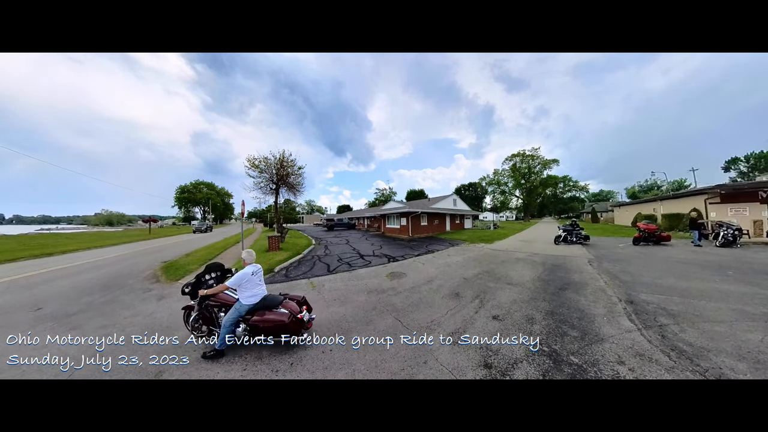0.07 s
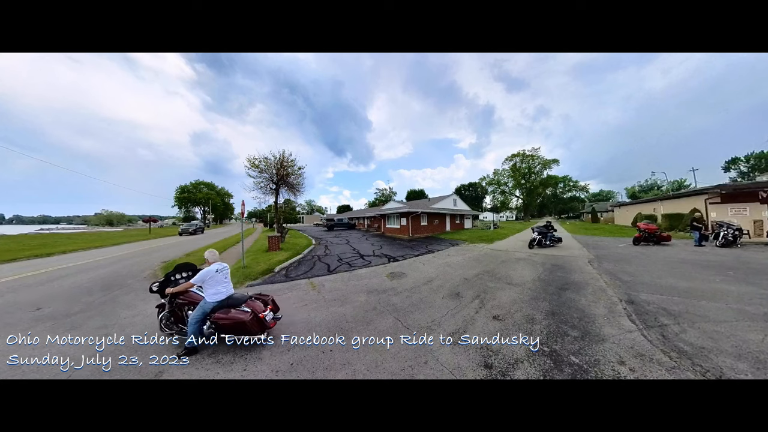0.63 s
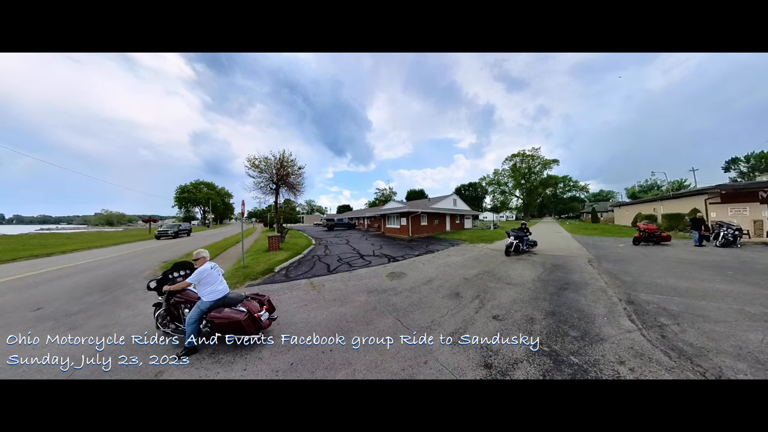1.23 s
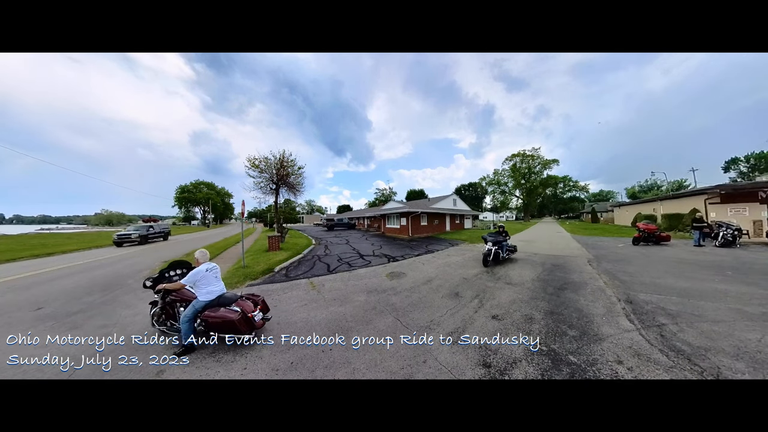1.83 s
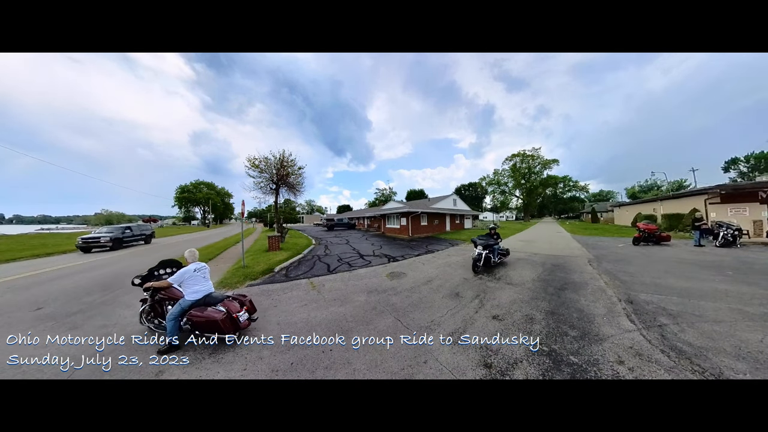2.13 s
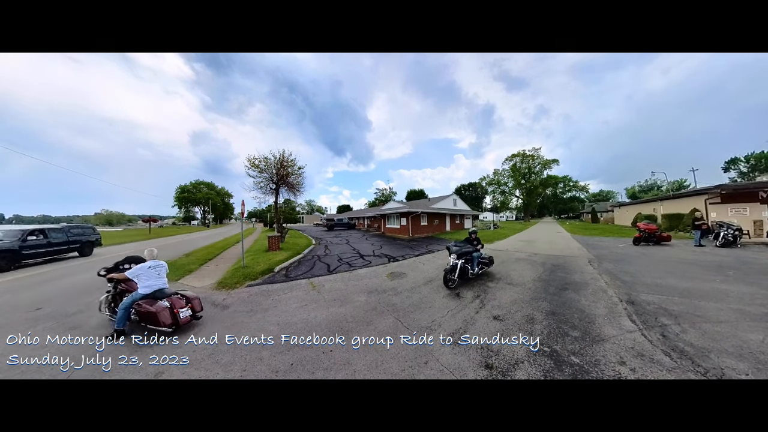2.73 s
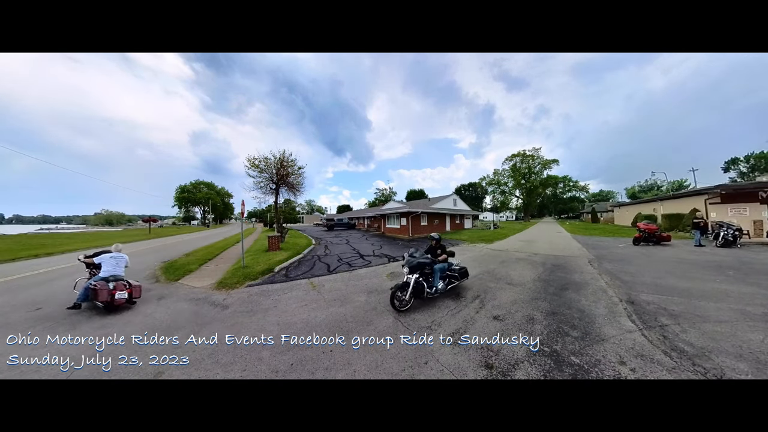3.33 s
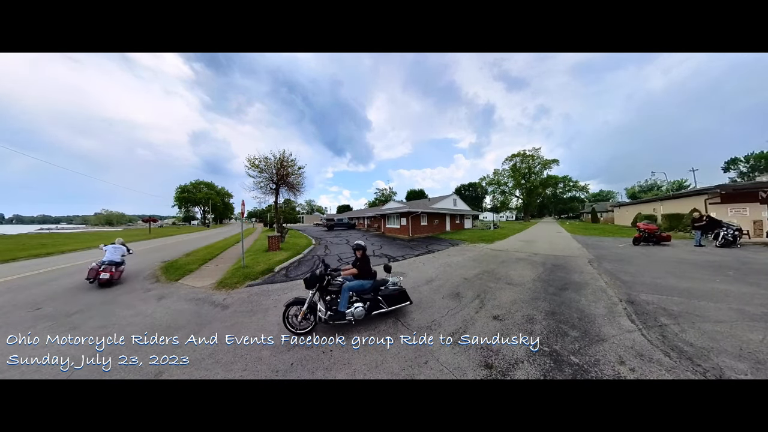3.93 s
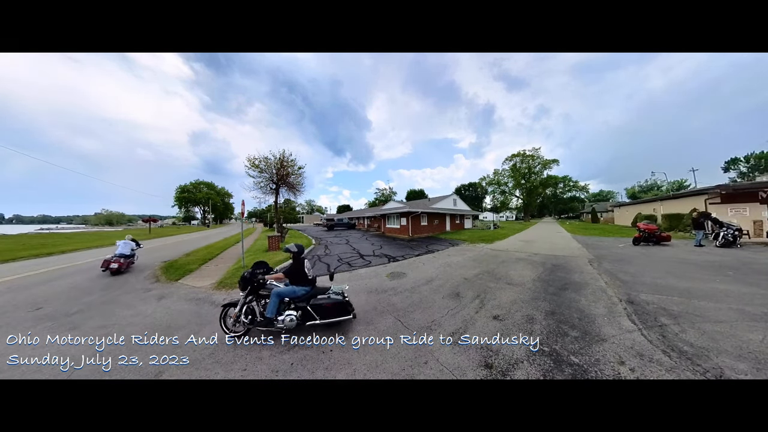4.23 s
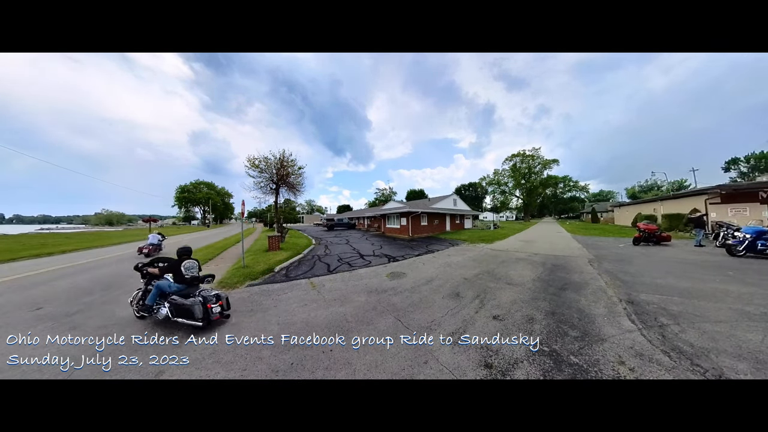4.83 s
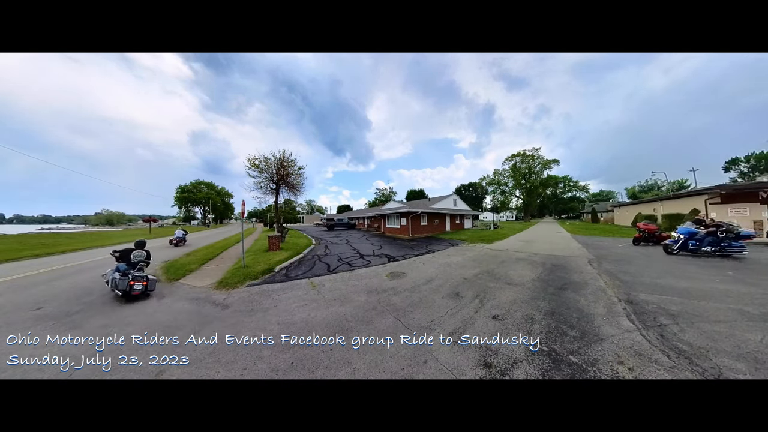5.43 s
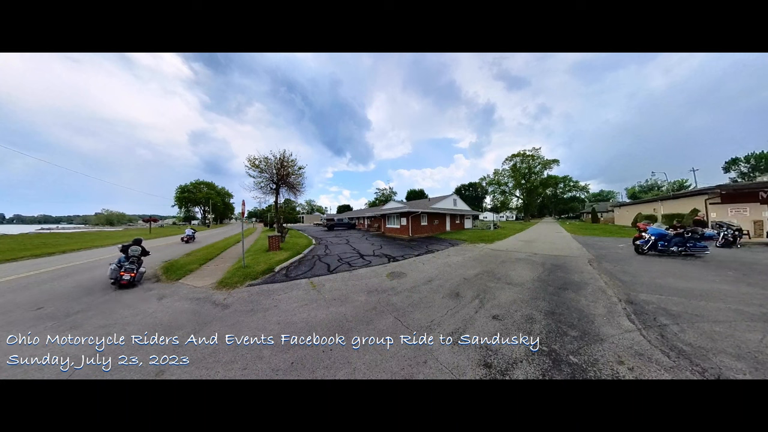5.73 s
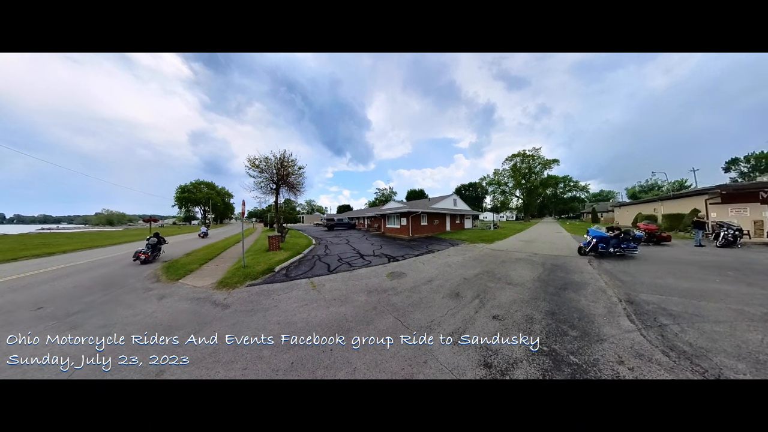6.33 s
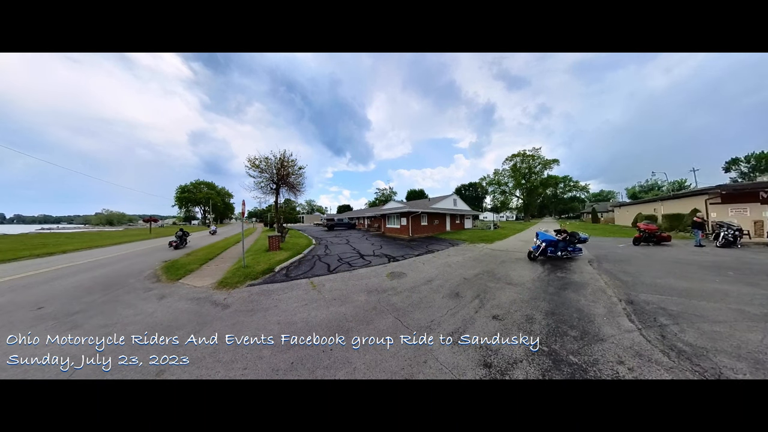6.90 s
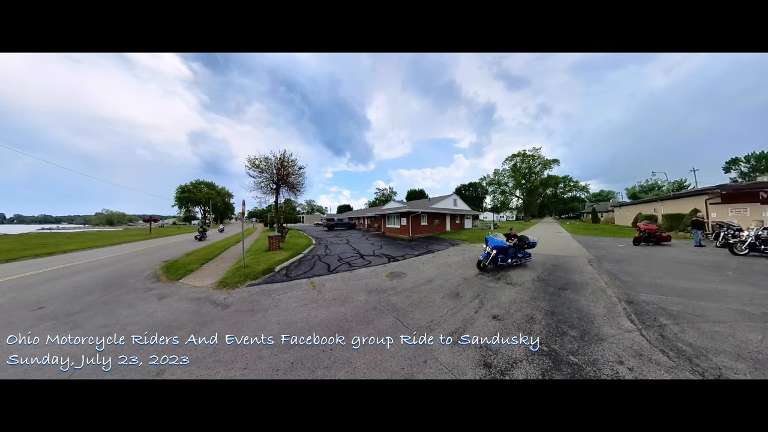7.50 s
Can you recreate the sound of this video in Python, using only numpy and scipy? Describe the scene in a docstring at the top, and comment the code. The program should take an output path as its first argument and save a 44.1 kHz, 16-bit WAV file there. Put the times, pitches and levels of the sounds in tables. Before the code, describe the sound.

Cruiser motorcycles chug at low revs, then pull away one after another with deep, booming, barking exhausts while others idle behind.

```python
"""Three V-twin motorbikes leave a parking lot one after another and pass a two-port microphone.
Every firing booms in the pipe, barks and spits a short ping, as loud as throttle, revs and distance
make it. Hard firings thump, loose metal chinks, intakes rasp, and gears and brakes whine.
More bikes idle and blip their throttles behind, amid rattling and a low breeze.
The buildings throw the sound back, and gain control holds the level."""
import sys
import numpy as np
from scipy import signal
from scipy.fft import rfft, irfft
from scipy.io import wavfile
from scipy.ndimage import uniform_filter1d, minimum_filter1d

SR = 44100
rng = np.random.default_rng(int(sys.argv[2]) if len(sys.argv) > 2 else 0)


def materialize(psi):
    """Save the field psi as 16-bit PCM at rate SR to the path in sys.argv[1].

    A 1-D psi becomes a single channel; in a 2-D psi each row is a channel.
    """
    bounded = np.clip(np.atleast_2d(psi).T, -1, 1)
    quanta = np.round(bounded * 32767).astype(np.int16)
    wavfile.write(sys.argv[1], SR, quanta)


N = 337806
TIME = np.arange(N) / SR


def amp(db):
    return 10 ** (np.asarray(db) / 20)


def evened(x):
    """Scale a sound to an average (rms) level of 1."""
    return x / np.sqrt(np.mean(x ** 2) + 1e-20)


def loudness(x, span_s):
    """Running average (rms) level of all channels."""
    return np.sqrt(abs(uniform_filter1d((x ** 2).mean(0), max(round(span_s * SR), 1))) + 1e-12)


def curves(rows):
    """Turn rows that start with a time into one curve for each other column."""
    s, *columns = np.transpose(rows)
    return [np.interp(TIME, s, c) for c in columns]


def db_at(points, hz):
    """Read a tone shape between its points, on a log frequency scale."""
    f, db = np.transpose(points)
    return np.interp(np.log(hz + 1), np.log(f + 1), db)


def colour(x, points, size=8192):
    """Filter a sound to a tone shape that falls away above its last point."""
    hz = abs(np.fft.fftfreq(size, 1 / SR))
    gain = amp(db_at(points, hz)) / np.maximum(hz / points[-1][0], 1) ** 2
    response = np.exp(np.conj(signal.hilbert(np.log(gain))))  # rings after a push, never before
    taps = np.fft.ifft(response).real[:size // 2]
    return irfft(rfft(x) * rfft(taps, N), N)


def resonate(x, hz, width_hz):
    """Let a sound ring at a pitch, which may move."""
    turn = np.exp(2j * np.pi * np.cumsum(hz * np.ones(N)) / SR)
    keep = np.exp(-np.pi * width_hz / SR)
    return 2 * (turn * signal.lfilter([1 - keep], [1, -keep], x / turn + 1e-18)).real


def wander(per_s):
    """A random drift, about 1 in size."""
    knots = rng.standard_normal(4000)
    return np.interp(TIME * per_s, np.arange(len(knots)), knots)


def place(x, side, lag_samples=7.3):
    """The nearer port hears all but the top treble first. Side -0.5 is fully left, 0.5 fully right."""
    turn = np.minimum(np.fft.rfftfreq(N) * lag_samples, 1)
    late = irfft(rfft(x) * np.exp(-2j * np.pi * turn), N)
    right = np.clip(.5 + side, 0, 1)
    return np.array([x + right * (late - x), late + right * (x - late)])


def firings(rpm, start, rear_lag):
    """The samples at which the front and rear cylinders fire; one cycle takes two turns."""
    cycles = start + np.cumsum(rpm) / (120 * SR)
    return [np.flatnonzero(np.diff(np.floor(cycles - lag)) > 0) for lag in (0, rear_lag)]


def pulses(fired, rear_db, scatter_db, delay_s=0):
    """One push for each firing, never quite equally strong."""
    train = np.zeros(N)
    for at, db in zip(fired, (0, rear_db)):
        strength = amp(db + scatter_db * rng.standard_normal(400)[:len(at)])
        train[np.clip(at + round(delay_s * SR), 0, N - 1)] = strength
    return train


def swell(train, rise_s, order):
    """Pressure swells and dies after each push."""
    u = np.arange(3000) / SR / rise_s
    return signal.oaconvolve(train, u ** order * np.exp(-order * u))[:N]


def boom(fired, rpm, pipe, rear_db, drone_db, delay_s):
    """Firings boom in the pipe; both cylinders add up to a drone at five times the cycle rate."""
    beats = evened(colour(pulses(fired, rear_db, .31, delay_s), pipe))
    push, drone_hz = pulses(fired, 0, 1, delay_s), 5 * rpm / 120
    drone = evened(resonate(resonate(push, drone_hz, 12), drone_hz, 12) / rpm)
    return evened(beats + amp(drone_db) * drone)


def bark(fired, tone, rough, muffler=None):
    """Each firing is part clean push, part rough puff of gas; an open muffler adds two notes."""
    push = pulses(fired, rear_db=-3, scatter_db=1.2, delay_s=-.001)
    puffs = swell(push, .0034, order=1) * rng.standard_normal(N)
    out = evened(colour((1 - rough) * evened(push) + rough * evened(puffs), tone))
    if muffler:
        hollow_hz, hollow_db, note_hz, note_db = curves(muffler)
        out += amp(-12.5) * np.interp(TIME - .00805, TIME, out)  # one bounce off the pipe's far end
        hollow = resonate(out, hollow_hz * (1 + .06 * wander(25)), width_hz=80)
        note = resonate(resonate(push, note_hz, 100), note_hz, 50)
        out = evened(out + amp(hollow_db) * hollow) + amp(note_db) * evened(note)
    return out


# The whistle in each spit. Each row: time in seconds, middle pitch in Hz.
WHISTLE_PITCH = [(1.3, 7830), (2.3, 6724), (3.4, 6100), (4.1, 6437), (7.66, 6040)]
# The tone of its hiss. Each row: frequency in Hz, level in dB.
HISS_TONE = [(2000, -9), (3700, 6.5), (4700, 6.5), (6300, 5.5), (8000, 1), (9500, -4), (12000, -11),
             (14000, -35)]
# Extra top treble in the hiss. Each row: time in seconds, share added.
HISS_TOP = [(1.8, 0), (2.4, 2.2), (3.7, 0)]


def spit(fired, side, spread=.1, fall_per_s=20, rough=.08):
    """Gas squeezes through a narrow gap: two falling whistles, pitched anew each firing, in a hiss."""
    train = pulses(fired, rear_db=-1.5, scatter_db=2.8, delay_s=-.005)
    count = np.cumsum(train > 0)
    age = TIME - np.maximum.accumulate(TIME * (train > 0))
    middle_hz, = curves(WHISTLE_PITCH)
    whistle = np.zeros(N)
    for ratio, db, peak_s in (1, 0, .005), (1.24, -3.5, .0042):
        pitch, fall, strength = rng.standard_normal((800, 3))[count].T
        glide = -fall_per_s * (1 + .5 * fall) * (np.minimum(age, 2 * peak_s) - peak_s)
        hz = ratio * middle_hz * np.exp(spread * pitch + glide + rough * wander(3000))
        envelope = amp(db + 2 * strength) * evened(swell(train, peak_s, order=10))
        whistle += envelope * np.sin(2 * np.pi * np.cumsum(hz) / SR)
    # the hiss scatters off the frame and the road, differently to each port
    bursts = evened(swell(train, .005, order=8)) + .25 * evened(swell(train, .007, order=2))
    hiss = np.array([evened(colour(bursts * rng.standard_normal(N), HISS_TONE)) for _ in range(2)])
    hiss -= np.array([resonate(h, .61 * middle_hz, 1600) for h in hiss])  # weak below the whistle
    hiss += curves(HISS_TOP)[0] * np.array([resonate(h, 10800, 1560) for h in hiss])
    return amp(-3.5) * place(evened(whistle), side) + hiss


def throttle(twists, lag_s=.017):
    """The throttle follows the rider's hand a moment late."""
    hand = sum(opening * ((TIME >= start) & (TIME < end)) for start, end, opening in twists)
    keep = np.exp(-1 / (lag_s * SR))
    return signal.lfilter([1 - keep], [1, -keep], np.minimum(hand, 1))


def path(nearest_s, nearest_m, m_per_s, acceleration, side):
    """A bike rolls by, then speeds up: how close it is, how far its tail faces us, and its side."""
    since = TIME - nearest_s
    along = m_per_s * since + .5 * acceleration * np.maximum(since, 0) ** 2
    distance = np.hypot(nearest_m, along)
    tail = along / distance
    return nearest_m / distance, tail, side - .67 * tail


# How boom, bark and spit change, one row for each.
# Each row: dB with the throttle shut, dB per octave of revs, dB with the tail facing us.
EXHAUST_CHANGES = [(-6.5, 2.5, 3.5), (-11, -1.5, 4.5), (-28, -4.5, -6.5)]


def ride(fired, rpm, twists, route, booms, barks, boom_db, bark_db, spit_db):
    """Mix a moving bike's boom, bark and spit by throttle, revs, distance and heading."""
    closeness, tail, side = route
    shut, octaves = 1 - throttle(twists), np.log2(rpm / rpm.mean())
    boom_gain, bark_gain, spit_gain = [
        closeness * amp(db + shut_db * shut + revs_db * octaves + tail_db * tail)
        for db, (shut_db, revs_db, tail_db) in zip((boom_db, bark_db, spit_db), EXHAUST_CHANGES)]
    return place(boom_gain * booms + bark_gain * barks, side) + spit_gain * spit(fired, side)


# Engine speed. Each row: time in seconds, turns per minute.
FIRST_REVS = [(0, 1090), (1.4, 1109), (1.7, 841), (1.9, 960), (2.15, 1352), (2.42, 1684), (2.7, 1304),
              (3, 1288), (3.27, 1137), (3.55, 1377), (4, 1570), (5.2, 2106), (7.66, 2800)]
# Twists of the throttle. Each row: start and end in seconds, opening from 0 to 1.
FIRST_TWISTS = [(1.707, 1.98, 0.77), (1.982, 2.47, 0.87), (2.5, 3.111, 0.72), (3.12, 4.767, 0.84),
                (4.738, 5.095, 0.68), (5.093, 8, 0.37)]
# The tones of the boom and of a soft bark. Each row: frequency in Hz, level in dB.
FIRST_BOOM_TONE = [(30, -16.5), (50, -5.5), (65, 2.5), (108, 1.5), (150, -4.5), (200, -16.5), (300, -27),
                   (500, -56.5), (1200, -88)]
SOFT_BARK_TONE = [(100, -11), (300, 14), (450, -1), (700, 1), (1100, -4.5), (1600, -6.5), (4000, -13),
                  (9000, -23)]
FIRST_START, FIRST_LAG = .3, .44  # in engine cycles


def first_bike():
    """The first bike's exhaust has a soft, breathy bark and the strongest spit."""
    rpm, = curves(FIRST_REVS)
    fired = firings(rpm, FIRST_START, FIRST_LAG)
    booms = boom(fired, rpm, FIRST_BOOM_TONE, rear_db=1, drone_db=-10.5, delay_s=.0004)
    barks = bark(fired, SOFT_BARK_TONE, rough=.87)
    route = path(nearest_s=5.5, nearest_m=3, m_per_s=-.5, acceleration=16, side=0)
    return ride(fired, rpm, FIRST_TWISTS, route, booms, barks, boom_db=-13, bark_db=-33.5, spit_db=-31.5)


# The first bike's low note. Each row: time in seconds, pitch in Hz, level in dB.
THROB_NOTE = [(0, 108, -18.5), (.85, 111, -18), (1.3, 93, -20), (1.7, 124, -21), (2.9, 118, -20),
              (4.2, 125, -40)]


def throb(width_hz=65):
    """Firings ring the low note of the first bike's pipe until it is away."""
    hz, db = curves(THROB_NOTE)
    fired = firings(curves(FIRST_REVS)[0], FIRST_START, FIRST_LAG)
    push = pulses(fired, rear_db=-2.5, scatter_db=1)
    note = resonate(resonate(push, hz, width_hz), hz, width_hz)
    return place(amp(db) * note / loudness(note[None], .36), 0)


# Engine speed. Each row: time in seconds, turns per minute.
SECOND_REVS = [(0, 1089.0), (1.5, 1396.0), (2.5, 1451.0), (3.3, 1688.0), (3.7, 1560.0), (4.05, 1256.0),
               (4.45, 1193.0), (4.8, 1352.0), (5.1, 1447.0), (5.5, 1587.0), (6, 1890.0), (6.4, 2177.0),
               (6.85, 2506.0), (7.1, 2040.0), (7.66, 1800.0)]
# Twists of the throttle. Each row: start and end in seconds, opening from 0 to 1.
SECOND_TWISTS = [(3.054, 3.85, 0.34), (4.015, 4.725, 0.8), (4.696, 5.6, 0.53), (5.59, 6.86, 0.83)]
# The tones of the boom and of a hard bark. Each row: frequency in Hz, level in dB.
SECOND_BOOM_TONE = [(35, -28.5), (54, 0.5), (70, 2), (92, -13), (130, -3), (165, -5.5), (215, -6.5),
                    (310, -20), (500, -35.5), (1200, -86)]
HARD_BARK_TONE = [(100, -15), (250, 17), (340, 18), (500, 4), (700, 7), (900, -4.5), (1300, -3),
                  (2000, -27), (4000, -9.5), (9000, -79)]
# An open muffler's notes, heard as its tail faces us.
# Each row: time in seconds, hollow note in Hz, its level in dB, pipe note in Hz, its level in dB.
MUFFLER_NOTES = [(3.9, 700, 2, 194, -32), (4.7, 710, -2.5, 178, 0), (5.55, 705, 13, 205, 0.5),
                 (5.95, 530, 12.5, 224, 3.5), (6.45, 573, 16.5, 240.4, 9), (6.9, 515, 14, 269, 0)]


def second_bike():
    """The second bike passes closest, barking hard through an open muffler."""
    rpm, = curves(SECOND_REVS)
    fired = firings(rpm, start=0, rear_lag=.42)
    booms = boom(fired, rpm, SECOND_BOOM_TONE, rear_db=4, drone_db=-3.5, delay_s=.0019)
    barks = bark(fired, HARD_BARK_TONE, rough=.15, muffler=MUFFLER_NOTES)
    route = path(nearest_s=4.9, nearest_m=2.23, m_per_s=1.86, acceleration=1.64, side=.03)
    return ride(fired, rpm, SECOND_TWISTS, route, booms, barks, boom_db=-8.5, bark_db=-25.5, spit_db=-45)


# Engine speed. Each row: time in seconds, turns per minute.
THIRD_REVS = [(0, 1090.0), (5.5, 1451.0), (6.7, 1704.0), (7.66, 1979.0)]
# Twists of the throttle. Each row: start and end in seconds, opening from 0 to 1.
THIRD_TWISTS = [(5.904, 6.566, 0.79), (6.709, 8, 0.78)]
# The tone of the boom. Each row: frequency in Hz, level in dB.
THIRD_BOOM_TONE = [(35, -32.5), (55, 13), (75, -0.5), (110, 3), (220, -11.5), (500, -33), (1200, -74)]


def third_bike():
    """The third bike creeps up on the right, its pipe droning."""
    rpm, = curves(THIRD_REVS)
    fired = firings(rpm, start=0, rear_lag=.44)
    booms = boom(fired, rpm, THIRD_BOOM_TONE, rear_db=-14.5, drone_db=-1.5, delay_s=.00123)
    barks = bark(fired, SOFT_BARK_TONE, rough=1)
    route = path(nearest_s=11.5, nearest_m=3.5, m_per_s=.46, acceleration=0, side=.9)
    return ride(fired, rpm, THIRD_TWISTS, route, booms, barks, boom_db=-17.5, bark_db=-31, spit_db=-37.5)


# The waiting bikes. Each row: turns per minute, level in dB, side.
WAITING_BIKES = [(1018, -20.5, 0.38), (1136.2, -14, 0.096)]
# The tone of their pipes. Each row: frequency in Hz, level in dB.
IDLE_TONE = [(35, -15.5), (60, 6), (80, -9.5), (92, 7), (104, 4), (135, -6), (190, -15), (240, -16.5),
             (330, -26), (600, -40), (1200, -45)]
# How their level moves. Each row: time in seconds, change in dB.
IDLE_FADE = [(0, -1), (2.8, 0), (3.8, -4.5)]


def idlers():
    """Waiting bikes chug at an unsteady idle."""
    out = np.zeros((2, N))
    for rpm, db, side in WAITING_BIKES:
        fired = firings(rpm * (1 + .07 * wander(5)), start=rng.random(), rear_lag=315 / 720)
        push = pulses(fired, rear_db=-2.4, scatter_db=1.8)
        out += amp(db) * place(evened(colour(push, IDLE_TONE)), side)
    return out * amp(curves(IDLE_FADE)[0])


# The tone of the rattle. Each row: frequency in Hz, level in dB.
CLATTER_TONE = [(150, 14), (650, 6.5), (1700, 0), (2700, -2.5), (5500, -11.5), (8000, -10.5),
                (10000, -17.5), (12400, -28.5), (13500, -44)]


def clatter(bikes):
    """Machinery rattles all around, and from the road in step with the moving bikes' loudness."""
    flutter = amp(1.4 * wander(170) + 1.3 * wander(30))
    road, left, right = (evened(colour(rng.standard_normal(N) * flutter, CLATTER_TONE)) for _ in range(3))
    return amp(-21.5) * loudness(bikes, .26) * place(road, -1) + amp(-35) * np.array([left, right])


def breeze():
    """Wind buffets each port separately with a low rumble."""
    tone = [(15, -2), (50, 23), (120, 13), (300, -27), (1000, -55)]  # Hz, dB
    gusts = [evened(colour(rng.standard_normal(N), tone)) * amp(2 * wander(3.5)) for _ in range(2)]
    return amp(-34) * np.array(gusts)


def echoes(x, fade_s=.44, size=16000):
    """Walls and parked machines scatter dull echoes, different at each port."""
    t = TIME[:size]
    taps = rng.standard_normal((2, size)) * (rng.random((2, size)) < .04)
    taps *= (t > .008) * amp(-60 * t / fade_s)
    # long waves reach both ports alike
    taps[1] += signal.lfilter(*signal.butter(1, 700, fs=SR), taps[0] - taps[1])
    dulled = signal.lfilter(*signal.butter(2, 4500, fs=SR), x[:1])
    return signal.oaconvolve(dulled, taps / np.linalg.norm(taps[0]), axes=1)[:, :N]


# Quick twists of a throttle in the lot. Each row: start in seconds, gas level in dB, hiss level in dB,
# upper edge of the gas in Hz, decay of one firing in seconds, drop per firing in dB.
THROTTLE_BLIPS = [(0.462, -24.5, -38.5, 1100, 0.026, 6.5), (0.897, -26, -40, 740, 0.021, 1),
                  (0.974, -11.5, -30.5, 700, 0.0094, 29), (1.468, -20.5, -41.5, 428, 0.023, 1.5),
                  (5.658, -7.5, -23, 890, 0.004, 25)]
# The tone of their hiss. Each row: frequency in Hz, level in dB.
BLIP_HISS_TONE = [(3000, -20), (8000, 8), (11000, -3), (13000, -13)]


def blips(count=9, gap_s=.037, slowing=1.2, rise_s=.0046, pipe_hz=406, width_hz=215):
    """Each blip is a run of hard firings: bursts of gas that ring the pipe, slow down and fade."""
    out, k, age = np.zeros(N), np.arange(count), TIME[:SR // 4]
    gaps = gap_s * slowing ** k
    hiss = evened(colour(rng.standard_normal(N), BLIP_HISS_TONE))
    for s, gas_db, hiss_db, edge_hz, decay_s, drop_db in THROTTLE_BLIPS:
        train = np.zeros(N)
        train[np.round((s + np.cumsum(gaps) - gaps[0]) * SR).astype(int)] = amp(-drop_db * k)
        bursts = signal.oaconvolve(train, (1 - np.exp(-age / rise_s)) * np.exp(-age / decay_s))[:N]
        gas = signal.lfilter(*signal.butter(1, [250, edge_hz], "band", fs=SR), rng.standard_normal(N))
        gas = signal.lfilter(*signal.butter(1, 3 * edge_hz, fs=SR), gas)
        note = resonate(resonate(rng.standard_normal(N), pipe_hz, width_hz), pipe_hz, width_hz)
        gas = evened(gas) + amp(-12) * evened(note)
        out += (amp(gas_db) * gas + amp(hiss_db) * hiss) * bursts
    return place(out, 1)


# The hardest firings, as throttles are blipped and the second bike labours past.
# Each row: start in seconds, level in dB, hollow note in Hz.
HARD_FIRINGS = [(.464, -15, 557), (.942, -22, 440), (.976, -14, 416), (1.474, -12.5, 660), (1.51, -18, 436),
                (4.148, -13, 685), (4.301, -14, 664), (4.399, -12, 464), (4.599, -12.5, 430),
                (4.782, -14, 710), (4.868, -26, 725), (4.953, -10, 760), (5.284, -10.5, 720),
                (5.625, -20, 450), (6.207, -18, 675), (6.519, -10.5, 470)]
# The tone of their knock. Each row: frequency in Hz, level in dB.
KNOCK_TONE = [(90, -17), (200, -4), (330, 4.5), (480, -3), (590, -13), (730, -13), (950, -13.5),
              (2000, -16)]
# Where they come from. Each row: time in seconds, side.
KNOCK_SIDE = [(2, 1), (3.1, -0.47)]


def thumps(rise_s=.0027, ring_db=-11):
    """Single hard firings knock in the muffler and ring its hollow note."""
    train, rings, age = np.zeros(N), np.zeros(N), TIME[:SR // 20]
    envelope = age / rise_s * np.exp(1 - age / rise_s)
    for s, db, hz in HARD_FIRINGS:
        at = round(s * SR)
        train[at] = amp(db)
        rings[at:at + len(age)] += amp(db + ring_db) * envelope * np.sin(2 * np.pi * hz * age)
    knock_peak = abs(colour(signal.unit_impulse(N), KNOCK_TONE)).max()
    return place(colour(train, KNOCK_TONE) / knock_peak + rings, curves(KNOCK_SIDE)[0])


# Loose metal on the first bike. Each row: start in seconds, pitch in Hz, level in dB.
METAL_CHINKS = [(.621, 8250, -38), (.729, 8000, -31.5), (.838, 8050, -36), (.948, 8340, -41),
                (1.167, 8060, -35.5), (1.275, 6480, -32), (1.756, 8500, -30.5), (1.888, 7230, -24.5)]


def chinks(rise_s=.003, fade_s=.04):
    """Small metal parts, shaken at idle, ring briefly on two close notes."""
    out, age = np.zeros(N), TIME[:SR // 10]
    envelope = np.minimum(age / rise_s, 1) * amp(-60 * age / fade_s)
    for s, hz, db in METAL_CHINKS:
        at, phase = round(s * SR), 2 * np.pi * hz * age
        out[at:at + len(age)] += amp(db) * envelope * (np.sin(phase) + amp(-4) * np.sin(1.045 * phase))
    return place(out, -.5)


# Air drawn in as a throttle opens. Each row: start and end in seconds, centre and width in Hz, level in dB.
INTAKE_RASPS = [(1.713, 1.9, 1310, 2300, -36.5), (1.964, 2.306, 1160, 775, -37.5),
                (2.763, 3.02, 730, 690, -40.5), (3.91, 4.77, 1160, 1520, -39.5),
                (5.61, 6.117, 1030, 870, -40.5)]


def rasps():
    """Air roars through an intake, in gulps at the first bike's firing rate."""
    fired = firings(curves(FIRST_REVS)[0], start=.1, rear_lag=FIRST_LAG)
    gulps = evened(swell(pulses(fired, rear_db=0, scatter_db=2), .008, order=1))
    air, out = (.5 + gulps) * rng.standard_normal(N), np.zeros(N)
    for start, end, hz, width_hz, db in INTAKE_RASPS:
        progress = np.clip((TIME - start) / (end - start), 0, 1)
        band = signal.butter(2, [hz / (1 + .5 * width_hz / hz), hz + .5 * width_hz], "band", fs=SR)
        out += amp(db) * np.sqrt(abs(np.sin(np.pi * progress))) * evened(signal.lfilter(*band, air))
    return place(out, -.7)


# Gear and brake whines. Each row: start and end in seconds, first, middle and last pitch in Hz,
# waver as a share of the pitch, level in dB, the octave's level against that in dB, side.
WHINE_NOTES = [(3.05, 3.9, 2070, 2210, 2050, .055, -42, -8, -.7),
               (7.25, 8.7, 897, 925, 960, .011, -38.5, -30, .8)]


def whines():
    """Gears and brakes sing thin, wavering tones that swell and fade."""
    out = np.zeros((2, N))
    for start, end, *pitches, waver, db, octave_db, side in WHINE_NOTES:
        progress = np.clip((TIME - start) / (end - start), 0, 1)
        hz = np.interp(progress, [0, .5, 1], pitches) * (1 + waver * wander(600))
        phase = 2 * np.pi * np.cumsum(hz) / SR
        tone = np.sin(phase) + amp(octave_db) * np.sin(2 * phase)
        out += place(amp(db) * np.sqrt(2 * abs(np.sin(np.pi * progress))) * tone, side)
    return out


def scene():
    """Three bikes ride off in front of the waiting ones."""
    bikes = first_bike() + second_bike() + third_bike() + thumps() + rasps() + chinks()
    lot = idlers() + blips()
    direct = bikes + throb() + lot
    return direct + echoes(amp(-5.5) * bikes + amp(-3.5) * lot) + clatter(bikes) + whines() + breeze()


# The left port is brighter. Each row: frequency in Hz, dB added on the left and taken off the right.
PORT_TILT = [(1500, 0), (2500, .2), (4100, 1.3), (7500, 2), (13000, 2.6)]


def record(dry, hold_db=-13.5, ratio=34, listen_s=.085, ceiling=.71, limiter_samples=400):
    """The microphone cuts rumble, holds the level, tames peaks and loses the highest treble."""
    x = signal.lfilter(*signal.butter(4, 37, "high", fs=SR), dry)
    x = x / np.maximum(loudness(x, listen_s) / amp(hold_db), 1) ** (1 - 1 / ratio)
    tilt_db = db_at(PORT_TILT, np.fft.rfftfreq(N, 1 / SR))
    x = amp(4.5) * irfft(rfft(x) * amp(np.array([tilt_db, -tilt_db])), N)
    # a fast limiter holds the bass down hard and the treble only a little
    gain = np.minimum(1, ceiling / (abs(x).max(0) + 1e-9))
    gain = uniform_filter1d(minimum_filter1d(gain, limiter_samples), limiter_samples)
    bass = signal.filtfilt(*signal.butter(2, 400, fs=SR), x)
    x = bass * gain + (x - bass) * gain ** .35
    treble_cut = signal.firwin(127, 13300, window=("kaiser", 9), fs=SR)
    return signal.oaconvolve(x, treble_cut[None], "same")


dry = scene()
out = record(dry)
materialize(out)
```